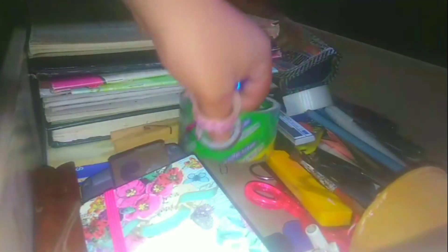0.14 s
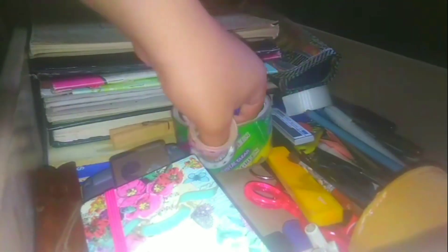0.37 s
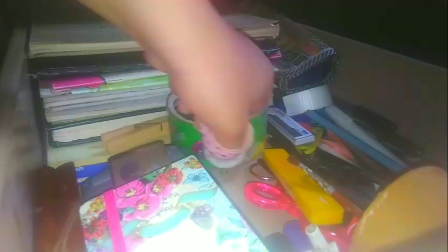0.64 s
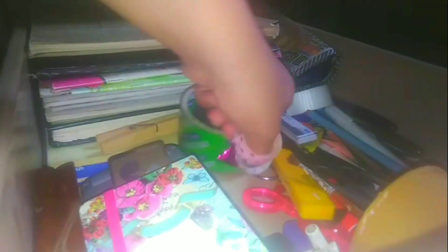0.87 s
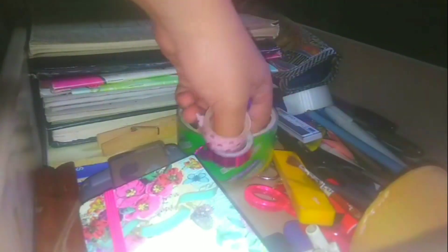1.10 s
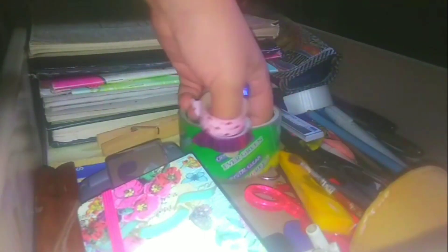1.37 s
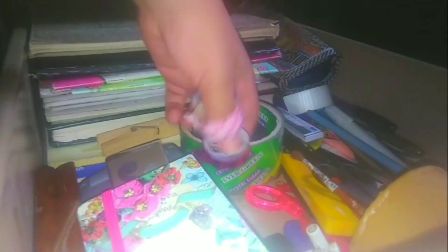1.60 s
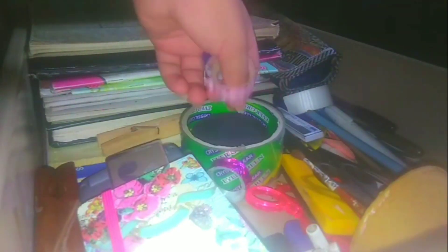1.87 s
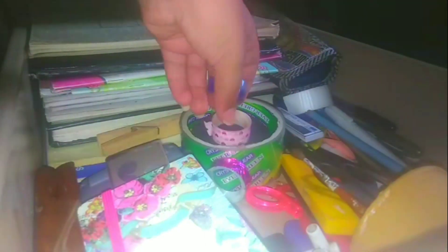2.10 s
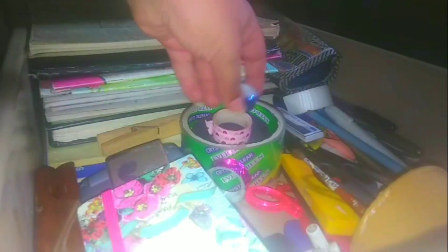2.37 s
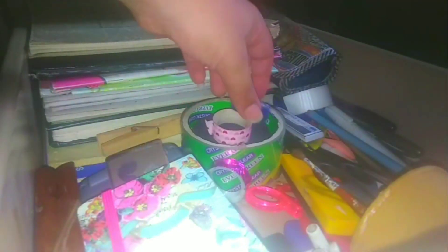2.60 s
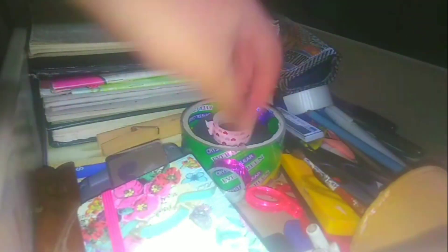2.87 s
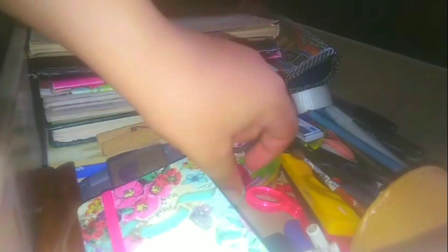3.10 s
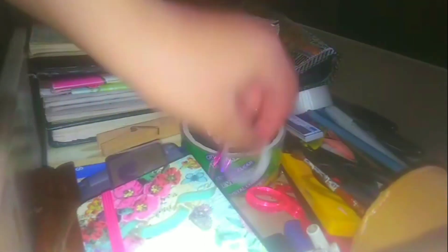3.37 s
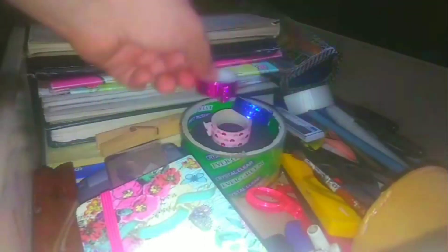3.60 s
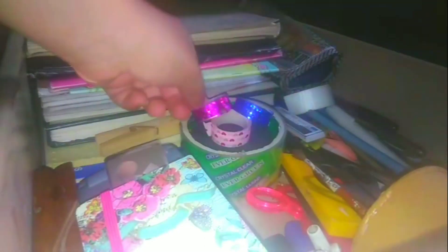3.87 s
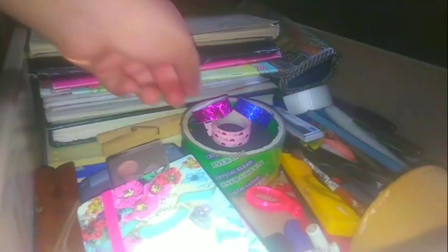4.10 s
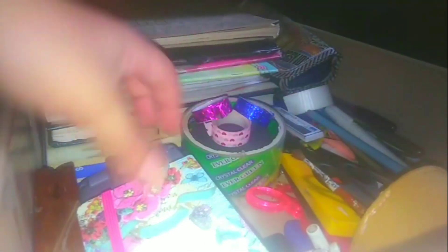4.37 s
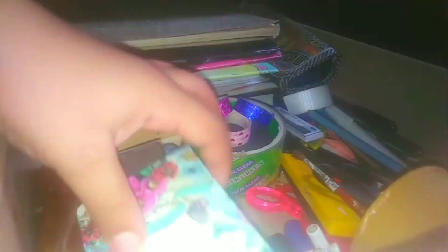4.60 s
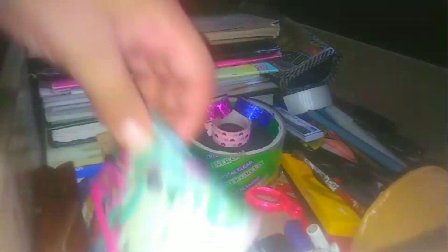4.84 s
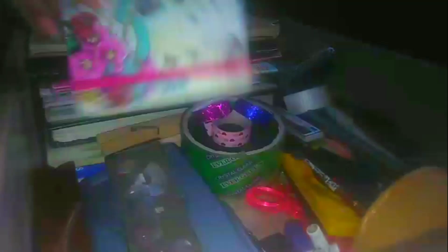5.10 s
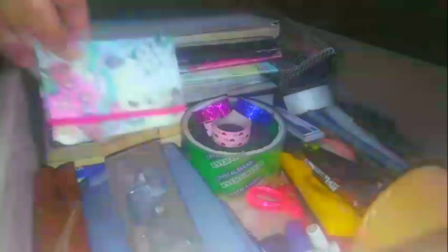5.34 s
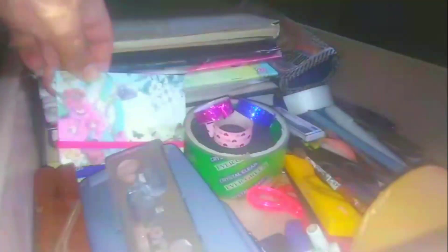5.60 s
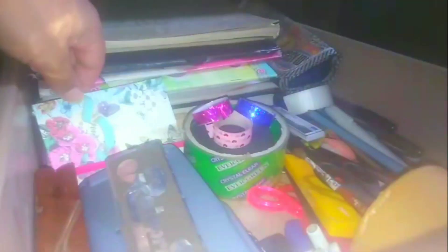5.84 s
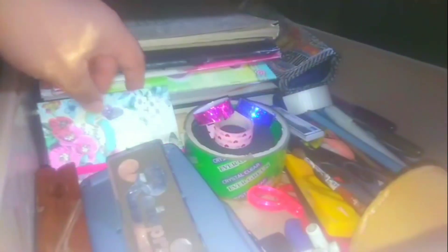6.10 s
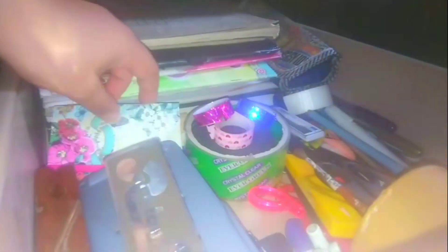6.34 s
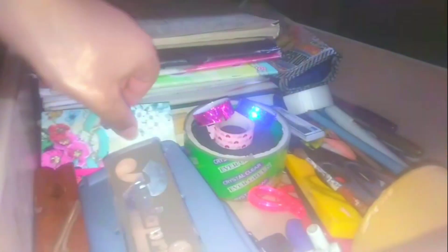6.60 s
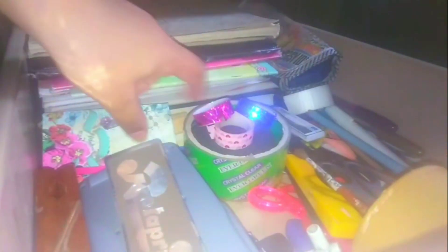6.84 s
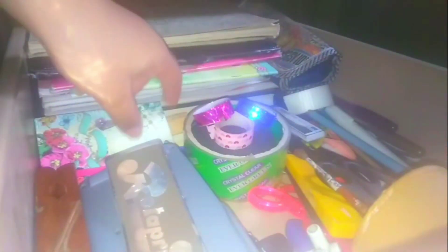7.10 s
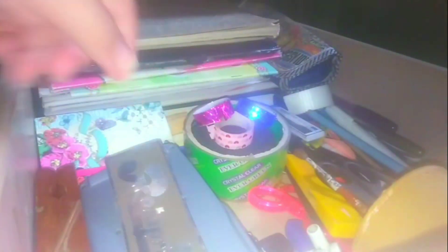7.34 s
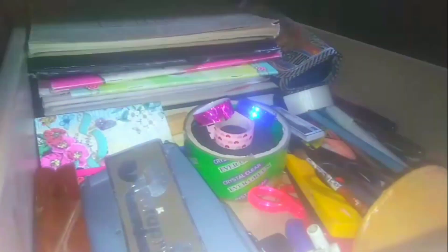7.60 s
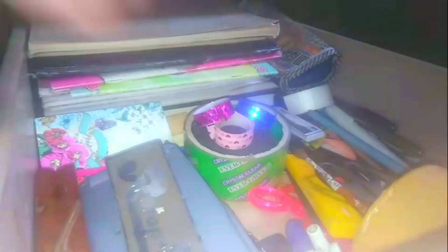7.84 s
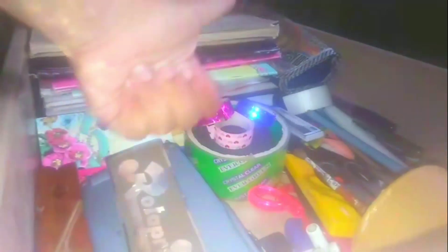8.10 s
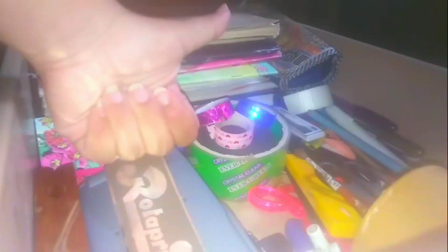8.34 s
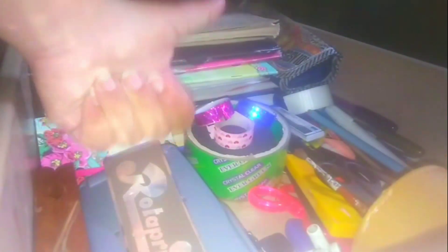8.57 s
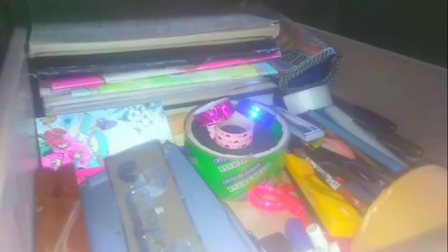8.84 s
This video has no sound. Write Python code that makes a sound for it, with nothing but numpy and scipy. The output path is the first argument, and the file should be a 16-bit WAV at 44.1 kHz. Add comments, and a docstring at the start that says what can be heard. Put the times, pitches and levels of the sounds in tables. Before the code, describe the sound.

Close, dry stereo phone pickup inside a wooden drawer. At once, a large tape roll lands with the loudest double knock, woody with a thud, followed from 0.3 to 0.5 s by a cluster of clacks and a short scrape. Light shuffling taps run around 0.75-1.15 s. Two firm knocks come at 1.6 s as a small roll drops, then a click at 1.85. About 2.5-2.75 s a tiny metal clink, a rub and several crisp knocks. From 3 to 4.5 s it is nearly quiet, with faint brushing and glossy ticks. From 4.55 s a notebook is grabbed with quick small clicks and rustle, tapping down at 5.5 and more firmly at 5.87. Sliding scrapes and clicks run 6.5-7.5 s, then scattered pats and ticks, a sharper one at 7.9, ending with a click and brief scuff at 8.9. A faint, throbbing mid-low hum wavers throughout, with low rumble and slight hiss.

```python
"""Knocks, clicks and rustle close by: a hand stacks tape rolls, drops small items in and slides a notebook
about in a wooden drawer. Struck modes and noise bursts make the contacts; shaped noise with tiny snaps makes
the rustle of paper and plastic. A faint hum of throbbing band noise wavers over a low rumble.
The phone's noise suppressor turns down the tails and quiet gaps; a little hiss remains."""
import sys
import numpy as np
from scipy import signal
from scipy.io import wavfile
from scipy.ndimage import uniform_filter1d

SR = 44100
rng = np.random.default_rng(int(sys.argv[2]) if len(sys.argv) > 2 else 0)


def ratio(d):
    """dB to gain"""
    e = np.asarray(d, float) / 20
    return 10 ** e


def pcm_store(signal):
    """Save signal as 16-bit PCM."""
    levels = np.round(np.clip(np.atleast_2d(signal), -1, 1) * 32767)
    wavfile.write(sys.argv[1], SR, levels.astype(np.int16).T)


N = 395136

# Contacts. Each row: start in seconds, then relative levels in dB of item click, drawer knock, thud, bright tick.
CONTACTS = [(0.0423, -27.5, -24.5, -27, -36.5), (0.061, -27, -25.5, -30, -42),
            (0.284, -38.5, -36.5, -51, -62), (0.304, -67, -47, -67, -44.5),
            (0.3385, -49, -35.5, -38.5, -40), (0.3617, -41, -37.5, -32.5, -80),
            (0.392, -42.5, -37, -41, -44), (0.4207, -43.5, -38, -41, -67), (0.478, -40, -40.5, -52, -54),
            (0.489, -30, -37, -42, -39.5), (0.748, -43, -41.5, -42, -52.5), (0.784, -52, -46, -58, -79),
            (0.845, -44, -49, -51.5, -68), (0.943, -58, -53, -77, -56.5), (0.9656, -56, -45, -66, -59),
            (0.9897, -47, -43, -61, -55.5), (1.107, -53.5, -59.5, -93, -46.5), (1.15, -60, -54.5, -72, -82),
            (1.512, -56, -60, -65.5, -76), (1.5985, -33.5, -30.5, -35.5, -36),
            (1.6266, -30, -25.5, -32.5, -44.5), (1.852, -35, -39.5, -55, -54), (1.964, -62, -48, -60, -92),
            (2.0232, -51.5, -43.5, -50, -93.5), (2.579, -35, -27.5, -42, -49.5),
            (2.615, -43, -35, -51, -56), (2.733, -30.5, -29.5, -42, -42), (2.742, -33.5, -38, -44.5, -49),
            (3.0785, -57.5, -49.5, -54, -83.5), (4.5521, -59, -47, -83, -51), (4.58, -44, -42.5, -71, -54),
            (4.657, -49, -40.5, -87, -58), (4.7409, -36, -36.5, -85, -51), (4.767, -45, -52, -86, -67),
            (4.833, -38.5, -63, -82, -53), (4.8418, -42, -42.5, -80, -51), (4.8804, -44.5, -43, -85, -82),
            (4.933, -50, -58, -79, -84), (5.047, -49, -57.5, -68, -67.5), (5.156, -73, -43, -64, -70),
            (5.174, -48, -47, -74, -85), (5.2024, -53, -46.5, -64.5, -74), (5.385, -37, -43.5, -47.5, -85),
            (5.4299, -44, -48.5, -49.5, -76), (5.4848, -30, -39, -50, -50.5), (5.617, -61, -50.5, -78, -86),
            (5.8671, -28.5, -29, -34, -37), (5.925, -50, -54.5, -46, -73.5),
            (6.508, -37.5, -48.5, -67, -54), (6.5917, -38.5, -76, -56.5, -74), (6.632, -64, -75, -62, -87),
            (6.8514, -41, -49, -66, -50), (6.8841, -30.5, -37.5, -58, -46), (7.0476, -47.5, -48, -66, -72),
            (7.0648, -36, -42.5, -50.5, -45), (7.207, -38.5, -48, -54.5, -46), (7.417, -39, -72, -67, -79),
            (7.639, -39, -42, -71, -54), (7.844, -47.5, -50.5, -52.5, -66), (7.8892, -48, -44.5, -70, -72),
            (7.901, -32, -58, -44.5, -29.5), (7.978, -42, -46.5, -48, -71), (8.1754, -50, -45, -85, -87),
            (8.1943, -35.5, -45.5, -53, -36.5), (8.342, -55, -57, -77, -57.5),
            (8.366, -50, -43.5, -56, -68), (8.451, -39, -50, -74, -43), (8.652, -80, -53, -47.5, -66),
            (8.6762, -48.5, -52.5, -65, -47), (8.784, -49, -41, -38, -81.5), (8.796, -63, -46, -41, -80),
            (8.8877, -35, -42, -55, -68)]
# Modes of the wooden drawer, low and middle, and of what lies in it.
# Each row: frequency in Hz, level in dB, nominal t60 in seconds.
THUD_MODES = [(72, -15.5, 0.11), (122, -10.5, 0.12), (181, -10, 0.12), (247.8, -12, 0.19),
              (306, 0.5, 0.061), (347, 0, 0.061)]
KNOCK_MODES = [(443.4, -2, 0.083), (605, -13.5, 0.052), (644.4, 4, 0.046), (735, -6, 0.039),
               (797, 1, 0.039), (873, 0.5, 0.044), (978.6, 3.5, 0.045), (1353.6, -12.5, 0.084)]
ITEM_MODES = [(1470, 13.5, 0.0053), (1833, 5, 0.034), (2204, 14, 0.0077), (2665, 10.5, 0.013),
              (2927, 1, 0.017), (3200, -11.5, 0.0099), (4500, -11.5, 0.0088)]
RING_DB_PER_DB = 0.3  # harder knocks ring longer; light ones are damped by the hand

# A small metal piece clinks once. Each row: frequency in Hz, level in dB, t60 in seconds.
CLINK_MODES = [(2880, 0, .1), (3010, -5, .08), (6080, -10, .06), (6300, -11, .05)]
CLINK_S, CLINK_DB = 2.4925, -34
# The large roll rings on after a knock. Each row: frequency in Hz, level in dB, t60 in seconds.
HOOP_MODES = [(1810, 0, .6)]
HOOP_S, HOOP_DB = 0.51, -64
# Faint ticks of a brushed glossy tape roll. Each row: start in seconds, relative level in dB.
ROLL_TICKS = [(3.436, -73.5), (3.473, -64), (4.035, -63.5), (4.287, -70), (4.404, -74)]
# Modes of that roll. Each row: frequency in Hz, level in dB, t60 in seconds.
ROLL_MODES = [(3180, -0.5, 0.18), (6000, -5, 0.066), (7200, -1.5, 0.045)]

# Strokes of sliding paper, plastic and skin.
# Each row: start in seconds, length in seconds, level in dB, swell to the end in dB, brightness in dB.
STROKES = [(0, 0.072, -62.5, 11, -5), (0.28, 0.18, -57, -17, -10), (0.94, 0.041, -78, -1, 6),
           (1.104, 0.029, -67, -44, 14), (1.565, 0.042, -62.5, 21, -18), (2.497, 0.073, -55, -21, -7),
           (3.069, 0.092, -65.5, -21, -21), (3.466, 0.079, -78.5, -17, 19), (3.565, 0.18, -83, -14, 12.5),
           (3.699, 0.1, -67, -4, 7), (3.839, 0.13, -70, -6.5, 5.5), (4.024, 0.17, -71.5, -17.5, -2.5),
           (4.543, 0.27, -60.5, -10, -2.5), (4.82, 0.37, -80.5, -16, -24), (5.154, 0.15, -77.5, 0.5, -3.5),
           (5.386, 0.051, -64, -2, 1), (5.785, 0.082, -90.5, 44, -9), (6.498, 0.34, -57, -0.5, -10),
           (6.813, 0.046, -53, 7.5, -16.5), (6.892, 0.055, -63.5, 10.5, -11), (6.98, 0.15, -63, 2, -11),
           (7.178, 0.063, -62.5, 1, -5.5), (7.299, 0.1, -65.5, -28, -8.5), (7.403, 0.033, -69, 17, -10),
           (7.472, 0.071, -69, 3, -3.5), (7.594, 0.91, -75.5, -16, -6), (7.865, 0.026, -55.5, 12.5, 1.5),
           (7.905, 0.12, -49, -18.5, -19), (8.064, 0.17, -82.5, 15, -9.5), (8.322, 0.085, -65.5, 12, -8.5),
           (8.431, 0.076, -71, 8, -13), (8.536, 0.029, -59, -25, -31.5), (8.641, 0.077, -71, 4, -9),
           (8.774, 0.095, -68, -17, -12), (8.888, 0.06, -44, -30, -9)]
# Rustle spectra: low scrape, body, top. Each row: frequency in Hz, gain in dB.
RUSTLE_LOW = [(550, -24), (750, 8), (1050, 9.5), (1400, -10.5), (2000, -53.5)]
RUSTLE_BODY = [(1000, -24.5), (1600, 3), (2200, 6), (3200, 5), (5000, -11.5), (6500, -36)]
RUSTLE_TOP = [(3000, -18.5), (4500, 0.5), (6500, 2), (9000, -11.5), (14000, -20)]
NOISE_PATCH = 7, 6  # bins, frames: random level patches in the noise, about 300 Hz by 35 ms
DRAG_DB, DRAG_DB_PER_BRIGHT_DB = -11.5, 0.54  # dull strokes scrape low the most
RELEASE_DB_PER_S = 701.5  # fall of a stroke once the hand stops
# Loose things settle after a contact: low part re knock, body re click, top re tick.
SETTLE_LOW_DB, SETTLE_BODY_DB, SETTLE_TOP_DB, SETTLE_DB_PER_S = -29.5, -28.5, -18, 161

# Room decay. Each row: frequency in Hz, t60 in seconds.
ROOM_T60 = [(80, 0.36), (300, 0.27), (1000, 0.26), (4000, 0.11), (12000, 0.28)]
# Hum over time. Each row: time in seconds, hum level in dB, low rumble level in dB.
HUM_LEVELS = [(0.0, -47.5, -66), (0.3, -50.5, -56), (0.75, -65, -63), (1.25, -56.5, -70.5),
              (1.59, -52, -71), (1.8, -50.5, -47), (2.22, -72, -101), (2.4, -75.5, -101), (2.49, -53, -100),
              (2.64, -52.5, -81), (2.72, -42.5, -82), (2.87, -51.5, -62.5), (2.96, -73.5, -90),
              (3.04, -53.5, -69), (3.37, -58, -73.5), (3.79, -62.5, -72), (3.98, -57.5, -70.5),
              (4.32, -53.5, -72), (4.77, -52, -82), (5.86, -61, -74.5), (6.06, -67.5, -87),
              (6.24, -78, -101), (6.56, -50.5, -79.5), (6.71, -55, -63.5), (7.04, -56.5, -57),
              (7.44, -57.5, -72.5), (7.73, -66, -76), (8.04, -55.5, -57), (8.46, -56, -87),
              (8.64, -57.5, -84), (8.67, -53, -46), (8.75, -60, -69), (8.96, -58, -75)]
# Pitch drift of the hum. Each row: time in seconds, centre in Hz.
HUM_CENTRE = [(0, 399), (1.3, 465), (2.94, 423), (3.07, 483), (3.92, 498), (4.02, 462.4), (4.99, 473),
              (6.27, 411), (6.34, 505), (6.65, 417), (8.96, 443)]
# Passing narrow tones. Each row: start in seconds, length in seconds, frequency in Hz, level over the band in dB.
HUM_TONES = [(1.25, .3, 475, 13.5), (3.027, 0.17, 564, 13), (3.312, 0.29, 422, 13), (3.417, 0.33, 535, 6.5),
             (4.015, 0.27, 403.8, 20.5), (4.393, 0.26, 467.6, 18), (4.993, 0.34, 474, 7.5),
             (6.622, 0.31, 380, 16), (6.958, 0.23, 356, 13), (7.195, 0.36, 393.8, 14.5),
             (8.101, 0.42, 404, 18.5)]
# Rumble spectrum. Each row: frequency in Hz, gain in dB.
RUMBLE = [(25, -20), (55, -2.5), (75, 3), (125, 1.5), (200, -19), (300, -9), (340, -36)]
# Likeness of left and right in all stereo noise. Each row: frequency in Hz, correlation.
LIKENESS = [(60, 1), (300, 0.84), (640, 0.81), (1400, 0.021), (15000, 0.073)]

# Suppressor threshold. Each row: frequency in Hz, power per bin in dB.
GATE = [(100, -105), (450, -98), (650, -100), (1000, -100), (4000, -100), (14000, -104)]
# The two microphone ports. Each row: frequency in Hz, left minus right in dB.
PORTS = [(60, -3.5), (110, 0), (200, -6), (380, 3), (700, -5), (1290, -2.5), (2380, -3.5), (4400, 5.5),
         (8120, 9), (15000, -9)]
# Hiss spectrum. Each row: frequency in Hz, gain in dB.
HISS = [(18, -81), (30, -43), (267, -13.5), (394, -8), (1480, -16.5), (7060, -21), (12500, -19.5),
        (13900, -14), (15000, -37.5)]
HISS_DB = -86.5
LOW_EDGE_HZ, HIGH_EDGE_HZ = 56, 14400


def evened(x):
    """Scales to rms 1."""
    return x / np.sqrt(np.mean(x ** 2) + 1e-20)


def smooth_twice(x, size):
    """Two running means over the last axis, in samples."""
    return uniform_filter1d(uniform_filter1d(x, size=size), size=size)


def read(points, hz):
    """Reads a spectrum table on a log-frequency axis."""
    f, value = np.transpose(points)
    return np.interp(np.log(hz + 1), np.log(f + 1), value)


def curve(table):
    """Reads every column of a time table at each sample."""
    s, *columns = np.transpose(table)
    return [np.interp(np.arange(N) / SR, s, c) for c in columns]


def noise(shape, patchy_db, size=512, patch=(4, 24)):
    """Stereo noise, rms 1, from random short-time spectra; shape(hz) gives gains, patch is in bins and frames."""
    hz = np.fft.rfftfreq(size, 1 / SR)[:, None]
    frames = N // (size // 4) + 5
    a, b, c, d, patches = rng.standard_normal((frames, len(hz), 5)).T
    patches = uniform_filter1d(patches, size=patch[0], axis=0)
    patches = evened(uniform_filter1d(patches, size=patch[1], axis=1))
    same = np.clip(read(LIKENESS, hz), -1, 1)
    left = a + 1j * b
    right = same * left + np.sqrt(1 - same ** 2) * (c + 1j * d)
    z = np.array([left, right]) * shape(hz) * ratio(patchy_db * patches)
    return evened(signal.istft(z, nperseg=size, noverlap=size * 3 // 4)[1][:, :N])


def ring(modes, chance, spread_db, rise_s, detune, longer=1):
    """Modes struck at a random spot die exponentially; 1/6 s long, peak 1."""
    t = np.arange(SR // 6)[:, None] / SR
    hz, db, t60 = np.transpose(modes)
    k = len(hz)
    level, shift = chance[:k], chance[k:2 * k]
    decay = ratio(db + spread_db * level - 60 * t / np.abs(longer * t60))
    partials = decay * np.sin(2 * np.pi * hz * (1 + detune * shift) * t + np.pi * shift)
    x = partials.sum(1) * (1 - np.exp(-t[:, 0] / rise_s))
    return x / np.abs(x).max()


def add(mix, s, sound, pan_db, lag):
    """Places a sound by level difference and by a delay of lag samples (left if positive, else right)."""
    for side, heard in enumerate(sound * np.ones((2, 1))):
        first = round(s * SR) + max(round(lag * (1 - 2 * side)), 0)
        part = mix[side, first:][:len(heard)]
        part += ratio(pan_db * (.5 - side)) * heard[:len(part)]


def contacts():
    """Each contact thuds and knocks the drawer, rings the item and scuffs; thuds are centred."""
    mix, t = np.zeros((2, N)), np.arange(SR // 6) / SR
    chances = rng.standard_normal((len(CONTACTS), 3, 20))
    grit = rng.standard_normal((len(CONTACTS), len(t)))
    top = signal.butter(3, (3800, 13500), "band", fs=SR, output="sos")
    middle = signal.butter(4, (1100, 3900), "band", fs=SR, output="sos")
    wood = signal.butter(3, 1700, fs=SR, output="sos")
    lead = 600  # samples of scuff before the blow lands
    late = t - lead / SR
    after = np.exp(-late / 0.0024) + 0.72 * np.exp(-late / 0.00065)
    scuff = np.where(late < 0, 0.25 * np.exp(late / 0.0074), after)
    for (s, click_db, knock_db, thud_db, tick_db), chance, g in zip(CONTACTS, chances, grit):
        pan_db, lag = 1.2 * chance[1, -1], chance[0, -1]
        # one sharp edge; the scuff differs at the two ports
        blow = np.array([g, g[::-1]]) * scuff + 4.1 * (late == 0)
        tick, snap = signal.sosfilt(top, blow), signal.sosfilt(middle, blow)
        noisy = ratio(click_db - 4.0) * snap / np.abs(snap).max()
        noisy = noisy + ratio(tick_db + 5.0) * tick / np.abs(tick).max()
        item = signal.sosfilt(middle, ring(ITEM_MODES, chance[0], 4.7, 0.00096, 0.047))
        chatter = ratio(1.37 * evened(uniform_filter1d(g, size=90)))  # loose things buzz on the wood
        longer = ratio(RING_DB_PER_DB * (knock_db + 33))
        knock = chatter * ring(KNOCK_MODES, chance[1], 4.35, 1 / 450, 0.045, longer)
        thud = uniform_filter1d(chatter, size=150) * ring(THUD_MODES, chance[2], 1.9, 0.0024, 0.028)
        add(mix, s - lead / SR, noisy, pan_db, lag)
        add(mix, s, ratio(click_db - 3.0) * item, pan_db, 5 * lag)
        add(mix, s, ratio(knock_db + 2.5) * signal.sosfilt(wood, knock), pan_db, 4 * lag)
        add(mix, s, ratio(thud_db + 4.5) * thud, 0, 0)
    return mix + clink_and_hoop(grit[0]) + roll_ticks(chances, grit)


def clink_and_hoop(g):
    """The metal piece and the large roll ring, roughened as the piece chatters on what it lands on."""
    mix = np.zeros((2, N))
    rattle = ratio(2.0 * evened(smooth_twice(g, 60)))
    add(mix, CLINK_S, ratio(CLINK_DB) * rattle * ring(CLINK_MODES, np.zeros(16), 0, 1 / 400, 0), 0, 4)
    add(mix, HOOP_S, ratio(HOOP_DB) * rattle ** 2 * ring(HOOP_MODES, np.zeros(2), 0, 1 / 200, 0), 0, 0)
    return mix


def roll_ticks(chances, grit):
    """The brushed roll's modes ring under a rough random envelope."""
    mix = np.zeros((2, N))
    for (s, db), chance, g in zip(ROLL_TICKS, chances, grit):
        rough = 1 + evened(uniform_filter1d(g, size=70))
        add(mix, s, ratio(db) * rough * ring(ROLL_MODES, chance[0], 3.5, 1 / 400, 0.021), 0, 0)
    return mix


def rustle():
    """Sliding noise roughened by tiny snaps; dull strokes drag on wood and scrape low, bright ones hiss."""
    snaps = ratio(3.5 * np.minimum(rng.exponential(1, N), 2.5)) * (rng.random(N) < 220 / SR)  # 220 per s
    snap_tails = signal.lfilter([1], [1, -np.exp(-1 / (.003 * SR))], snaps)
    grain = evened(1 + .45 * snap_tails)
    flutter = evened(smooth_twice(rng.standard_normal(N), 500))  # of the pressure
    grain = grain * evened(ratio(2.5 * flutter))
    low = noise(lambda hz: ratio(read(RUSTLE_LOW, hz)), 1.5)
    body = noise(lambda hz: ratio(read(RUSTLE_BODY, hz)), 4.2, size=1024, patch=NOISE_PATCH)
    top = noise(lambda hz: ratio(read(RUSTLE_TOP, hz)), 2.1, size=1024, patch=NOISE_PATCH)
    # each snap rings one item mode per channel for a few cycles
    which, t = rng.integers(0, len(ITEM_MODES), (2, N)), np.arange(600) / SR
    for k, (hz, db, t60) in enumerate(ITEM_MODES):
        ping = ratio(db - 7.0 - 60 * t / (0.18 * t60)) * np.sin(2 * np.pi * hz * t)
        body = body + signal.oaconvolve(snaps * (which == k), ping[None], axes=1)[:, :N]
    # dragged things bump the wood, 60 per s on average
    bumps = ratio(5.5 * np.minimum(rng.exponential(1, N), 2)) * (rng.random(N) < 60 / SR)
    spot, t = rng.integers(0, len(KNOCK_MODES), N), np.arange(1500) / SR
    for k, (hz, db, t60) in enumerate(KNOCK_MODES):
        bump = ratio(db + 6.0 - 60 * t / (0.25 * t60)) * np.sin(2 * np.pi * hz * t)
        low = low + signal.oaconvolve(bumps * (spot == k), bump)[:N]
    low_gain, body_gain, top_gain = rubbing()
    return grain * (low_gain * low + body_gain * body + top_gain * top)


def rubbing():
    """Gains of the low, body and top rustle: hand strokes, and the settling after each contact."""
    gains, t = np.zeros((3, N)), np.arange(SR // 3) / SR
    for start, length, db, swell_db, bright_db in STROKES:
        shape_db = db + swell_db * np.minimum(t / length, 1)
        shape_db = shape_db - RELEASE_DB_PER_S * np.maximum(t - length, 0)
        colour_db = np.array([[DRAG_DB - DRAG_DB_PER_BRIGHT_DB * bright_db], [0], [bright_db]])
        part = gains[:, round(start * SR):][:, :len(t)]
        part += ratio(shape_db + colour_db)[:, :part.shape[1]]
    for s, click_db, knock_db, _, tick_db in CONTACTS:
        start_db = np.array([[knock_db + SETTLE_LOW_DB], [click_db + SETTLE_BODY_DB], [tick_db + SETTLE_TOP_DB]])
        part = gains[:, round(s * SR):][:, :len(t)]
        part += ratio(start_db - SETTLE_DB_PER_S * t)[:, :part.shape[1]]
    return smooth_twice(gains, 400)


def room(x):
    """Sparse taps of random sign per channel, each band dying at its own speed."""
    taps = np.zeros((2, SR // 2))
    starts = np.arange(200, SR // 2 - 20, 20)
    at = starts + rng.integers(0, 20, (2, len(starts)))
    np.put_along_axis(taps, at, rng.choice([-1., 1.], at.shape), 1)
    hz, t, z = signal.stft(taps, SR, nperseg=256)
    decay = ratio(-60 * t / read(ROOM_T60, hz)[:, None])
    tail = signal.istft(z * decay, SR, nperseg=256)[1]
    return signal.oaconvolve(x, tail / np.linalg.norm(tail[0]), axes=1)[:, :N]


def hum():
    """A throbbing band of noise with its passing tones, over a low rumble."""
    band = noise(hum_shape, 2.4, size=4096)
    throb = ratio(5.2 * np.tanh(evened(smooth_twice(rng.standard_normal(N), 500))))
    rumble = noise(lambda hz: ratio(read(RUMBLE, hz)) * (hz < 345), 0.61, size=2048)
    hum_db, rumble_db = curve(HUM_LEVELS)
    return ratio(hum_db) * band * evened(throb) + ratio(rumble_db) * rumble


def hum_shape(hz):
    """Gain over frequency and frame: a steep drifting band plus narrow resonances that come and go."""
    frame_s = np.arange(N // 1024 + 5) * 1024 / SR
    centre_hz = np.interp(frame_s, *np.transpose(HUM_CENTRE))
    gain = 1 / (1 + ((hz - centre_hz) / 110) ** 4)
    for start, length, tone_hz, db in HUM_TONES:
        on = np.exp(-(2 * (frame_s - start - length / 2) / length) ** 4)
        gain = gain + ratio(db) * on / (1 + ((hz - tone_hz) / 8) ** 2)
    return gain


def scene():
    """Contacts and rustle with their room tail, and the hum."""
    hits, rubs = contacts(), rustle()
    return hits + rubs + room(ratio(-4.0) * hits + ratio(-9.5) * rubs) + hum()


def top_cut(x):
    """Nothing passes above the cut-off."""
    return signal.sosfilt(signal.butter(12, 15610, fs=SR, output="sos"), x)


def record(dry):
    """The suppressor lowers bands whose smoothed power sinks under its threshold; a little hiss remains."""
    hz, _, z = signal.stft(dry, SR, nperseg=512, noverlap=384)
    power = uniform_filter1d((abs(z) ** 2).mean(0), size=2, axis=0)
    power = uniform_filter1d(power, size=13, axis=1)
    under_db = read(GATE, hz)[:, None] - 10 * np.log10(abs(power) + 1e-20)
    cut_db = np.clip(2.5 * under_db, 0, 22)
    gain = ratio(-cut_db) * (hz < HIGH_EDGE_HZ)[:, None]
    port_db = read(PORTS, hz)[:, None] * np.array([.5, -.5])[:, None, None]
    gated = signal.istft(z * gain * ratio(port_db), SR, nperseg=512, noverlap=384)[1][:, :N]
    heard = signal.sosfilt(signal.butter(4, LOW_EDGE_HZ, "high", fs=SR, output="sos"), gated)
    hiss = ratio(HISS_DB) * noise(lambda hz: ratio(read(HISS, hz)), 0.53, size=1024)
    return top_cut(heard + hiss)


dry = scene()
out = record(dry)
pcm_store(out)
```